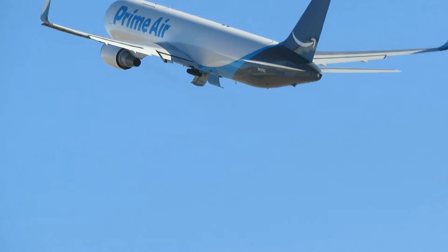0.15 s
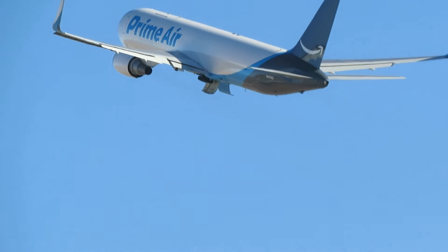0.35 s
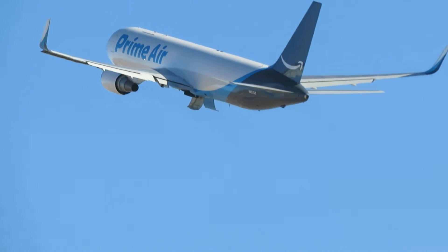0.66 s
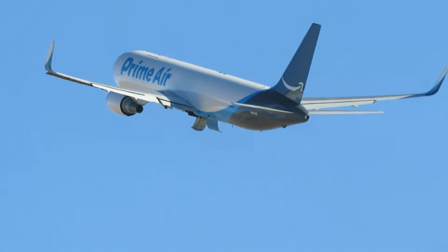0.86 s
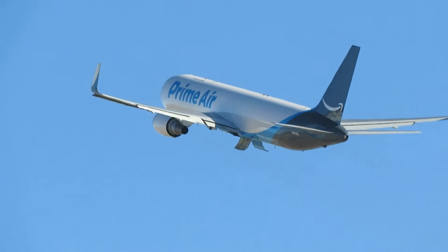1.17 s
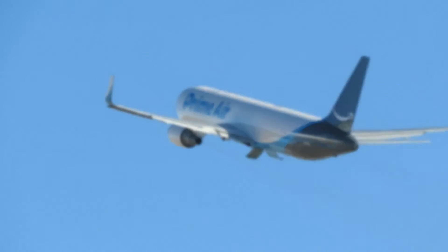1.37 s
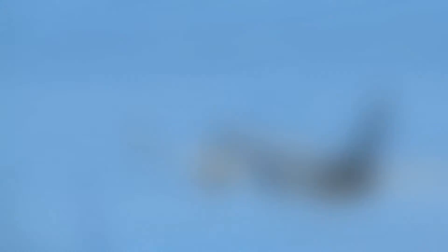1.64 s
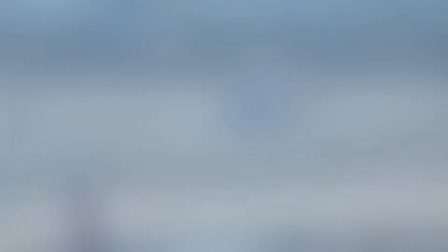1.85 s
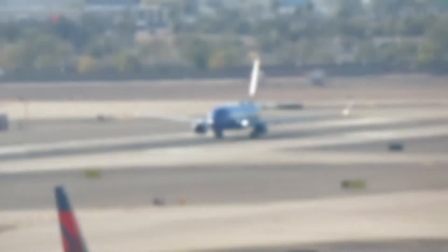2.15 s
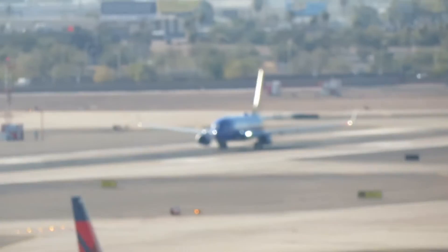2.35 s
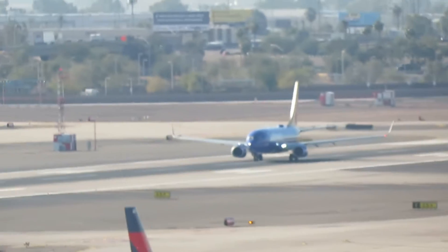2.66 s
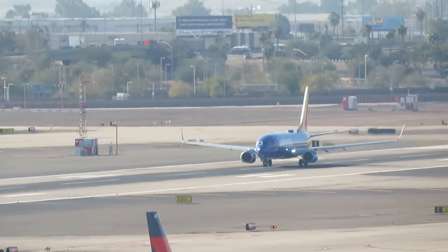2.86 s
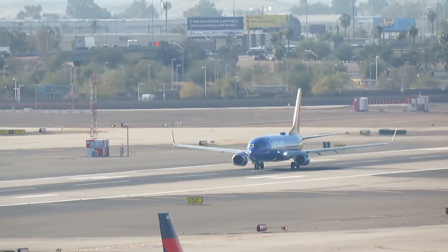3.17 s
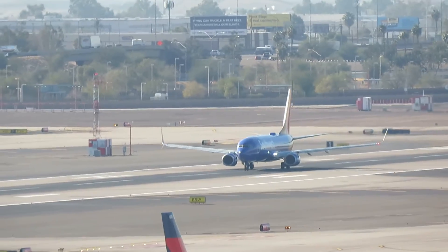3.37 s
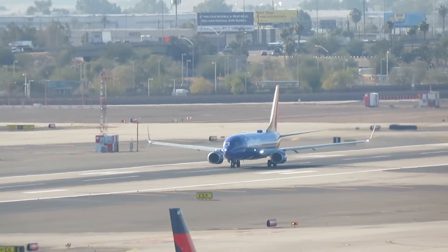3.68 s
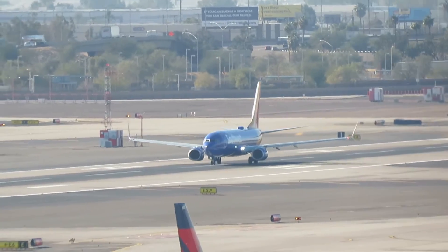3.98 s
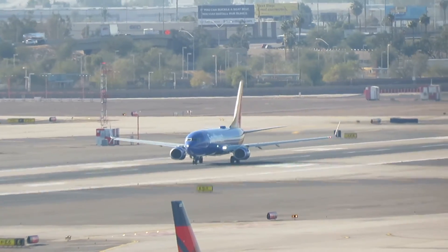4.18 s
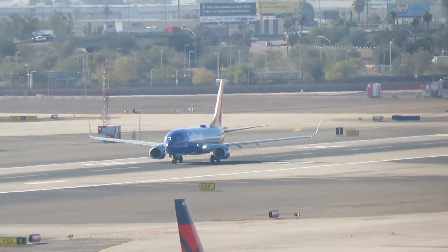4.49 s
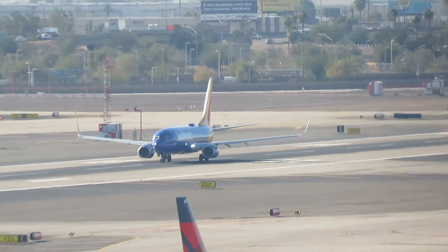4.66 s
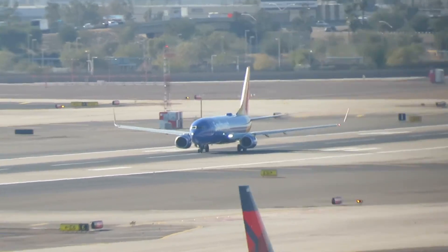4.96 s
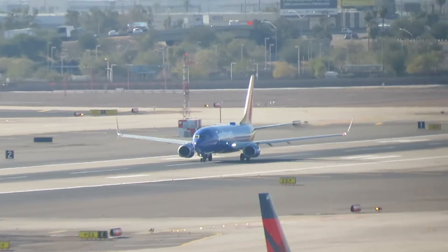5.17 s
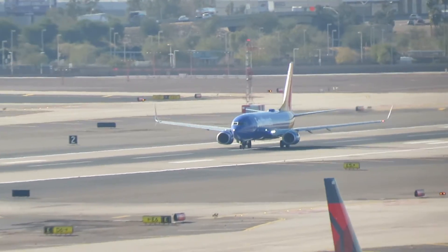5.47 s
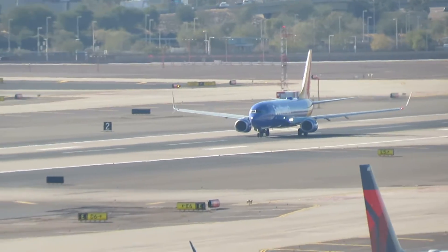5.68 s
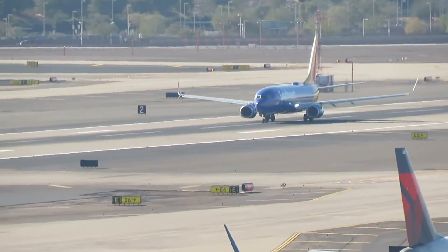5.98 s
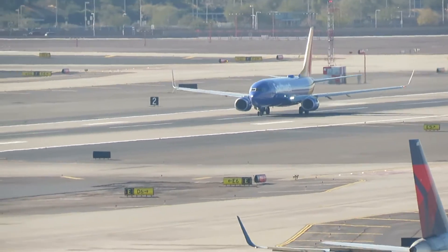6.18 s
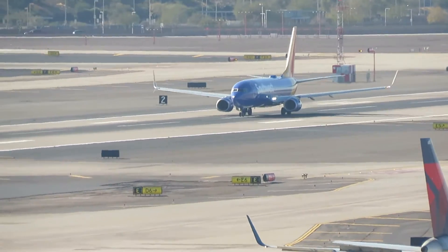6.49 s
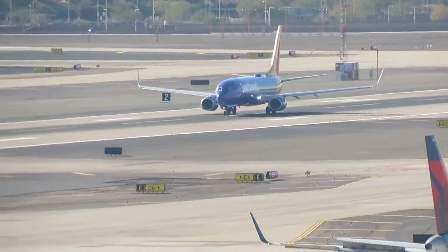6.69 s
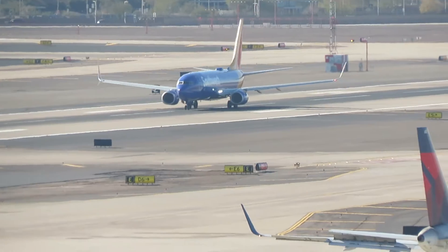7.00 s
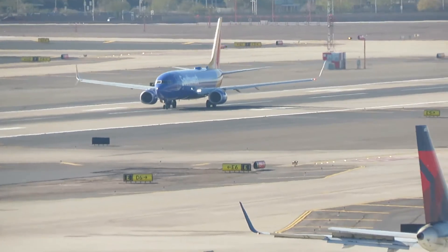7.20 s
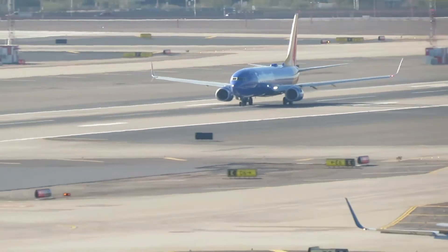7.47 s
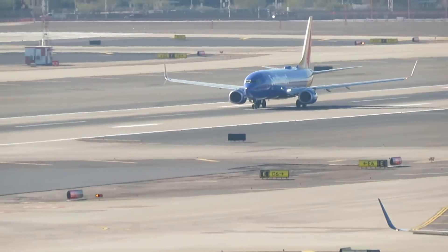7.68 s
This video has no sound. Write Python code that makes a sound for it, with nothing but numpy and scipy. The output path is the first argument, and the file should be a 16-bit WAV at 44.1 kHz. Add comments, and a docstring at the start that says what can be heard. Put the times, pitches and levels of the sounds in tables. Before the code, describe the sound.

Outdoor airfield: heavy rumbling jet engines draw off within two seconds, a camera knocks and rubs, then softer engine rumble, hiss and wavering whine remain.

```python
"""Jet engine roar on an airfield: a climbing jet fades within 2.3 s, over steady engines on the ground.
Both roars are noise in flickering half-octave bands; fan tones are wavering sines, whine lines sines
and narrow hiss. A hand-held camera swings round: two ports place the sound, camera body and hand shade
the treble, and the case ticks (slips ringing its modes) and is scraped (grainy noise)."""
import sys
import numpy as np
from scipy import signal
from scipy.fft import rfft, irfft, next_fast_len
from scipy.io import wavfile
from scipy.ndimage import uniform_filter1d

SR = 44100
rng = np.random.default_rng(int(sys.argv[2]) if len(sys.argv) > 2 else 0)


def bounce(signal):
    """Save signal as a 16-bit WAV file at the path given by the first command-line argument."""
    frames = np.transpose(np.atleast_2d(signal))
    limited = np.clip(frames, -1, 1)
    pcm = np.round(limited * 32767).astype(np.int16)
    wavfile.write(sys.argv[1], SR, pcm)


def level_to_linear(level):
    """Convert decibel levels to linear amplitude factors, elementwise."""
    exponent = np.asarray(level, float) / 20
    return 10 ** exponent


N = 345744
SIZE = next_fast_len(N + 2 ** 16, True)
BIN_HZ = np.arange(1, SIZE // 2 + 2) * SR / SIZE
TIME_S = np.arange(N) / SR

# climbing jet: (time [s], level [dB], tilt [dB per octave], below 0 is deeper and duller)
CLIMB = [(0, -12.5, 1), (.3, -14, 1.5), (.6, -12.5, -0.5), (.8, -15, 0), (1.05, -13.5, -0.64),
         (1.28, -12, -0.5), (1.45, -16.5, -0.5), (1.75, -15, -0.5), (2.0, -22.5, -4.5)]
# climbing roar spectrum: (frequency [Hz], relative density [dB per Hz])
CLIMB_COLOUR = [(12, -48.5), (20, -15.5), (54, -0.5), (141, -3.5), (237, -12.5), (287, -7.5), (436, -16.5),
                (988, -25), (1350, -32.5), (1930, -53.5), (2100, -42.5), (3000, -59.5), (3900, -88),
                (6600, -120)]
CLIMB_FADE_S, TILT_PIVOT_HZ = (1.47, 2.3), 150

# ground engine roar spectrum: (frequency [Hz], relative density [dB per Hz])
FIELD_COLOUR = [(14, -52.5), (27, -29), (50, -10), (70, -1), (92, -1.5), (123, -6.5), (184, -4.5),
                (243, -9.5), (403, -14.5), (828, -22), (1290, -28.5), (1660, -30.5), (2500, -37)]
# its hiss, dulled by the long way through air: (frequency [Hz], relative density [dB per Hz])
HISS_COLOUR = [(3150, -39.5), (3350, -43.5), (4000, -47.5), (4700, -52.5), (5100, -55), (6100, -58),
               (7000, -60), (8000, -62), (10000, -69.5), (13000, -75), (15500, -80)]
# colour change of the roar as the engines take up load: (frequency [Hz], final change [dB])
LOAD_COLOUR = [(40, 2), (70, -3), (115, -2), (180, 2.5), (300, -0.9), (1500, 0.5), (6000, -1.3)]
FIELD_DB, LOAD_SPAN_S = -20.5, (5.34, 5.95)
# roar lifted for a moment by moving air: (middle [s], half length [s], centre [Hz], lift [dB])
GUSTS = [(.06, 0.055, 904, 2), (0.222, 0.041, 1296, 1), (0.958, .07, 1200, 2), (1.321, 0.065, 803, 2),
         (2.73, .07, 1900, 4.5), (2.757, 0.26, 348, 1.5), (3.043, 0.091, 863, 1.5),
         (3.443, 0.18, 1150, 1.5), (3.926, 0.046, 1390, 0.5), (5.955, .12, 1200, 1)]
GUST_HALF_WIDTH_OCTAVES = 0.95

# fan tone swells: (middle [s], half length [s], added level before flutter [dB])
FAN_SWELLS = [(2.364, .05, -46.5), (2.652, .12, -43), (3.028, .13, -44.5), (3.366, .14, -41),
              (3.972, .1, -42.5), (4.37, 0.12, -41), (4.82, .13, -43.5), (5.243, 0.11, -43.5),
              (5.886, 0.27, -42.5), (6.546, 0.16, -41), (7.28, .2, -42), (7.76, 0.09, -42.5)]
FAN_HZ, FAN_FLOOR_DB, FAN_OCTAVE_DB = 812.9, -50.5, -53
# turbine whine lines before the swing: (frequency [Hz], nominal level [dB])
WHINE_BEFORE = [(2116, -64), (3881, -77), (4280, -78), (4802, -80), (5297, -78), (5502, -78), (5609, -78),
                (6062, -83)]
# turbine whine lines after the swing: (frequency [Hz], nominal level [dB])
WHINE_AFTER = [(781, -50), (1490, -59), (2436, -63), (4290, -74), (5105, -80), (5496, -77), (5663, -79),
               (5943, -79), (6153, -79), (7120, -87), (7343, -86)]
# drifting hissy turbine band: (time [s], centre [Hz], level before shade and flutter [dB])
BAND = [(0, 5500, -67.5), (1.4, 5550, -67), (2.3, 5900, -72), (3.5, 6050, -64.5), (4.2, 5600, -66),
        (5.5, 5400, -69.5), (7.84, 5470, -67)]
BAND_WIDTH_HZ, BAND_LIFT_DB = 450, 4
# brief whine flares: (middle [s], half length [s], frequency [Hz], level before flutter [dB])
FLARES = [(1.825, .012, 5500, -64), (2.297, .013, 6150, -60)]

# camera swing: (time [s], bearing of the sound [-1 right to 1 left], scattered share [dB])
SWING = [(0, -0.57, 2.5), (1.3, -0.82, 1.7), (1.6, -0.69, 6), (1.9, -0.098, 6.5), (2.15, 0.28, 2.5),
         (2.3, 0.72, 1.8), (2.5, 0.7, 0.91), (7.84, 0.81, 0.5)]
# port pair, sound from the left: (frequency [Hz], left lead [rad], left minus right [dB],
# scattered against direct [dB]); the last row just narrows the stereo width above 9 kHz
PORTS = [(60, 0, 0.5, -47.5), (250, -0.124, -0.5, -28), (1000, .05, 1.1, -18.5), (1600, -0.04, 0.5, -16),
         (2100, -0.013, 2.5, -13), (3100, 0.49, 4, -11), (3600, 1.05, 3, -9), (4200, 1.1, 2, -8),
         (5500, 0.93, 3, -5.5), (7200, 2, 1.5, -4.5), (8500, 0.49, 0.5, -3.5), (9800, .2, -0.5, -12)]
# shade of the camera body until it faces the runway: (time [s], shade [dB])
BODY = [(0, -2.5), (1.3, -3), (1.8, -3), (2.3, -0.5), (2.5, 0)]
# spectrum of the body shade: (frequency [Hz], share of the shade [0-1])
SHADOW = [(250, 0.35), (500, 0.7), (1000, 0.8), (2000, 0.86), (3500, 1), (7000, .9)]
# hand passing over the ports: (start [s], length [s], depth [dB])
COVERS = [(1.362, 0.36, -2), (2.157, .135, -7)]
# spectrum of the hand shade: (frequency [Hz], multiple of the depth [ratio])
HAND = [(900, .05), (1400, 0.6), (2000, 1.16), (2900, 1.05), (4000, 1.2), (6000, 0.8), (9000, .85)]
COVER_EDGE_S, LIFT_S = 0.008, 0.027
CUP_HZ, CUP_WIDTH_HZ, CUP_DB = 2880, 100, -60

# case ticks and rubs: (start [s], mid peak [dB], brightness [dB per octave], rub length [s],
# side against mid [dB])
TICKS = [(1.298, -29, -5.5, 0.0027, -2), (1.6125, -42, 13.5, .001, -4), (1.6162, -16, 1, 0.0011, -8.5),
         (1.667, -38.5, 2, 0.0022, 0), (1.71, -35.5, 5, 0.007, -1.5), (1.748, -33, -5, 0.0017, -4),
         (1.827, -41, 11, .006, -1), (1.837, -41, 10, .002, 3), (1.851, -32.5, 6, 0.009, 2),
         (2.147, -28.5, -2, 0.012, 0), (2.265, -33, 0, 0.004, 3)]
# case modes: (frequency [Hz], level [dB], t60 [s])
CASE = [(2170, -1, 0.016), (2690, 5, 0.009), (3160, -3, 0.0064), (3880, -1.5, 0.0065), (4390, -6.5, 0.0052),
        (5810, -9.5, 0.0051), (6160, -10.5, 0.0044), (8700, -27, .002), (10100, -18, 0.0029),
        (12000, -28.5, .0016)]
CRACK_DB, CRACK_S, CRACK_HZ, CASE_TOP_HZ = -18, 0.00023, 4200, 12540
# scatter of mode pitch [ratio] and level per tick; scale of slip size
GRIP_SHARE, GRIP_DB, SLIP_SPREAD_DB = 0.012, 1.0, 2.5
# skin sliding over the case: (start [s], length [s], level [dB rms])
SCRAPES = [(1.682, 0.066, -68.5), (1.801, .072, -66)]
SCRAPE_HZ = 7800, 12300


def along(table):
    """Columns of a curve, one value a sample."""
    time_s, *columns = np.transpose(table)
    return [np.interp(TIME_S, time_s, column) for column in columns]


def across(table):
    """Columns of a spectrum, one value a bin, on a log frequency scale."""
    hz, *columns = np.transpose(table)
    return [np.interp(np.log(BIN_HZ), np.log(hz), column) for column in columns]


def at(table, hz):
    """Value of a spectrum at one frequency, on a log frequency scale."""
    table_hz, values = np.transpose(table)[:2]
    return np.interp(np.log(hz), np.log(table_hz), values)


def walk(rate_hz):
    """Random levels held about 1 / rate_hz and slewed twice; spread near 1."""
    step = 32
    hold, count = int(SR / rate_hz / step), N // step + 2
    slow = np.repeat(rng.standard_normal(count // hold + 1), hold)
    slow = uniform_filter1d(uniform_filter1d(slow, hold), hold)[:count]
    return 1.3 * np.interp(np.arange(N) / step, np.arange(count), slow)


def shade(hz):
    """Level change in dB at one frequency: camera body until it has turned, and passing hand."""
    hand_db = 0
    for start_s, length_s, depth_db in COVERS:
        closing = (TIME_S - start_s) / COVER_EDGE_S
        lifting = (start_s + length_s - TIME_S) / LIFT_S
        hand_db = hand_db + depth_db * np.clip(np.minimum(closing, lifting), 0, 1)
    return at(SHADOW, hz) * along(BODY)[0] + at(HAND, hz) * hand_db


def gusts(hz):
    """Lift in dB at one frequency: moving air, Gaussian in time and in octaves."""
    lift_db = 0
    for middle_s, half_s, centre_hz, db in GUSTS:
        octaves = np.log2(hz / centre_hz) / GUST_HALF_WIDTH_OCTAVES
        lift_db = lift_db + db * np.exp(-((TIME_S - middle_s) / half_s) ** 2 - octaves ** 2)
    return lift_db


def roar(colour, level_db, change_db, flicker_db, gust_db):
    """Turbulent mixing noise in half-octave bands; air makes each flicker and neighbours swell together."""
    spectrum = rfft(rng.standard_normal(SIZE)) * level_to_linear(across(colour)[0])
    spectrum = spectrum * SIZE / np.sqrt(2 * np.sum(np.abs(spectrum) ** 2))  # unit rms
    out, gust = 0, walk(10.0)
    for octave in np.arange(4, np.log2(colour[-1][0]) + 0.5, 0.5):
        share = np.cos(np.pi * np.clip(np.log2(BIN_HZ) - octave, -0.5, 0.5)) ** 2
        band = irfft(spectrum * share, SIZE)[:N]
        gust = 0.6 * gust + 0.2 * walk(11.0)
        band_db = level_db + change_db(2 ** octave) + gust_db * gust + flicker_db * walk(25.0)
        out = out + level_to_linear(band_db) * band
    return out


def tone(hz, db, wander_hz):
    """Sine whose pitch wavers on the long way through moving air."""
    phase = 2 * np.pi * np.cumsum(hz + wander_hz * walk(12.0)) / SR
    return np.sqrt(2) * level_to_linear(db) * np.sin(phase + 2 * np.pi * rng.random())


def hiss(hz, width_hz, db):
    """Low-passed noise pair turned up to a centre that may move."""
    lowpass = signal.butter(2, width_hz, fs=SR, output="sos")
    slow = signal.sosfilt(lowpass, rng.standard_normal((2, N)))
    phase = 2 * np.pi * np.cumsum(hz + 0 * TIME_S) / SR
    return level_to_linear(db) * (slow[0] * np.cos(phase) + slow[1] * np.sin(phase)) / slow.std()


def climbing_jet():
    """Low jet roar from behind the aircraft, deepening and fading as it draws off."""
    level_db, tilt = along(CLIMB)

    def change_db(hz):
        return tilt * np.log2(hz / TILT_PIVOT_HZ) + shade(hz) + gusts(hz)

    noise = roar(CLIMB_COLOUR, level_db, change_db, flicker_db=0.95, gust_db=2.0)
    return np.interp(TIME_S, CLIMB_FADE_S, [1, 0]) * noise


def ground_roar():
    """Broad mixing noise whose colour shifts as the engines take up load."""
    load = np.interp(TIME_S, LOAD_SPAN_S, [0, 1])

    def change_db(hz):
        return load * at(LOAD_COLOUR, hz) + shade(hz) + gusts(hz)

    return roar(FIELD_COLOUR + HISS_COLOUR, FIELD_DB, change_db, flicker_db=0.5, gust_db=2.35)


def whine(lines, level_db):
    """Turbine lines that blink and drift in level; scattering air smears the high ones into narrow hiss."""
    out, centre_hz, blink = 0, along(BAND)[0], np.tanh(walk(24.0))
    for hz, db in lines:
        height = min(hz / 4500, 1)
        near_db = BAND_LIFT_DB * np.exp(-((hz - centre_hz) / BAND_WIDTH_HZ) ** 2)
        flutter_db = height * (3.0 * np.tanh(walk(28.0)) + 2.5 * blink) + 1.8 * np.tanh(walk(0.99))
        line = (1 - height) * tone(hz, db, 1.0) + 1.26 * height * hiss(hz, 20.0, db)
        out = out + level_to_linear(level_db + flutter_db + near_db) * line
    return out


def turbine_band():
    """Hissy band of turbine sound drifting in pitch."""
    centre_hz, level_db = along(BAND)
    return hiss(centre_hz, BAND_WIDTH_HZ, level_db + shade(6000) + 2.0 * walk(30.0))


def whine_flares():
    """Whine tones of strongly wavering pitch that flare up briefly."""
    out = 0
    for middle_s, half_s, hz, db in FLARES:
        envelope = np.exp(-((TIME_S - middle_s) / half_s) ** 4)
        out = out + envelope * tone(hz, db + 2.7 * walk(250.0), 97.0)
    return out


def fan_tones(turned):
    """Blade tone in swells and its octave, breaking up and wavering as the air stirs."""
    swells = level_to_linear(FAN_FLOOR_DB)
    for middle_s, half_s, db in FAN_SWELLS:
        swells = swells + level_to_linear(db) * np.exp(-((TIME_S - middle_s) / half_s) ** 4)
    blade = swells * tone(FAN_HZ, 1.1 * walk(14.0), 0.81)
    octave = turned * tone(2 * FAN_HZ, FAN_OCTAVE_DB + 4.1 * walk(2.8), 0.76)
    return np.interp(TIME_S, [1.9, 2.4], [0, 1]) * (blade + octave)


def ground_engines():
    """Roar, whine and fan tones; other lines come forward as the camera turns."""
    turned = np.clip((TIME_S - 1.6) / 1.2, 0, 1)
    shade_db = shade(6000)  # the whine is shaded with the airy treble
    before = (1 - turned) * whine(WHINE_BEFORE, 0.6 + shade_db)
    after = turned * whine(WHINE_AFTER, 0.49 + shade_db)
    return ground_roar() + before + turbine_band() + after + whine_flares() + fan_tones(turned)


def case_ring(t, bright_db, grip):
    """Case modes for one slip, shifted and damped by the grip, under a short onset."""
    modes = 0
    for (hz, db, t60_s), (shift, damp) in zip(CASE, grip):
        level_db = db + GRIP_DB * damp + bright_db * np.log2(hz / 2500)
        decay = np.exp(-np.log(1000) * t / t60_s)
        modes = modes + level_to_linear(level_db) * decay * np.sin(2 * np.pi * hz * (1 + GRIP_SHARE * shift) * t)
    return (1 - np.exp(-t / 0.00012)) ** 2 * modes


def case_ticks():
    """Rubs of tiny slips that crack and ring the plastic case; mid and side get unlike slips."""
    out, t = np.zeros((2, N + 4096)), np.arange(2048) / SR
    dull = signal.butter(4, CASE_TOP_HZ, fs=SR, output="sos")
    for start_s, peak_db, bright_db, rub_s, side_db in TICKS:
        start = int(start_s * SR)
        grip = rng.standard_normal((len(CASE), 2))
        stroke = np.clip(t / rub_s, 0, 1)
        for row, db in enumerate((0, side_db)):
            sizes = level_to_linear(SLIP_SPREAD_DB * rng.exponential(size=2048))
            slips = rng.standard_normal(2048) * sizes * np.sqrt(stroke) * (1 - stroke)
            # the shorter the stroke, the more it is one clean blow
            slips[0] = np.sqrt(np.sum(slips ** 2)) * 0.0019 / rub_s
            pulse = t / CRACK_S * np.exp(-t / CRACK_S) * np.sin(2 * np.pi * CRACK_HZ * t)
            crack = level_to_linear(CRACK_DB + 0.8 * bright_db) * pulse
            tick = signal.fftconvolve(slips, case_ring(t, bright_db, grip) + crack)
            tick = signal.sosfilt(dull, tick)
            out[row, start:start + len(tick)] += tick * level_to_linear(peak_db + db) / np.abs(tick).max()
    return out[:, :N]


def scrapes():
    """Grainy band of noise while skin slides, independent in mid and side."""
    grains = rng.standard_normal((2, N)) * level_to_linear(3.0 * walk(150.0))
    bandpass = signal.butter(3, SCRAPE_HZ, "bandpass", fs=SR, output="sos")
    grains = signal.sosfilt(bandpass, grains)
    envelope = 0
    for start_s, length_s, db in SCRAPES:
        stroke = np.clip((TIME_S - start_s) / length_s, 0, 1)
        envelope = envelope + level_to_linear(db) * np.sin(np.pi * stroke) ** 0.5
    return grains / grains.std() * envelope


def cupped_hand():
    """Narrow noise: the hollow under the hand resonates while it covers the ports."""
    start_s, length_s, _ = COVERS[1]
    inside_s = np.minimum(TIME_S - start_s, start_s + length_s - LIFT_S - TIME_S)
    return np.clip(inside_s / COVER_EDGE_S, 0, 1) * hiss(CUP_HZ, CUP_WIDTH_HZ, CUP_DB)


def ports(sound):
    """Mid and side of two close ports: lead and level step follow the bearing, plus scattered sound."""
    bearing, scatter_db = along(SWING)
    lead_rad, step_db, diffuse_db = across(PORTS)
    right = level_to_linear(-step_db) * np.exp(-1j * lead_rad)
    early = 2 ** 15
    # reflected ends: the roar's echoes are there from the start
    spectrum = rfft(np.pad(sound, (early, SIZE - N - early), "reflect"))
    direct = irfft(spectrum * (1 - right) / (1 + right), SIZE)[early:early + N]
    # phases of many late, weak paths make the scattered part unlike the direct sound
    paths = rng.standard_normal(early) * np.exp(-np.arange(early) / (0.1 * SR))
    turns_rad = np.angle(rfft(paths, SIZE))
    diffuse = irfft(spectrum * np.exp(1j * turns_rad) * level_to_linear(diffuse_db), SIZE)[early:early + N]
    diffuse = level_to_linear(1.5 * walk(20.0)) * diffuse
    return np.array([sound, bearing * direct + level_to_linear(scatter_db) * diffuse])


def scene():
    """Engines and cupped hand through the port pair; ticks and scrapes straight into mid and side."""
    airborne = climbing_jet() + ground_engines() + cupped_hand()
    mid, side = ports(airborne) + case_ticks() + scrapes()
    return np.array([mid + side, mid - side])


def roll_off(x):
    """The treble ends steeply here."""
    return signal.sosfilt(signal.butter(12, 15140, fs=SR, output="sos"), x)


def record(dry):
    """The recorder rounds the loudest peaks."""
    mix = 0.92 * np.tanh(dry / 0.95)
    return roll_off(mix)


dry = scene()
out = record(dry)
bounce(out)
```